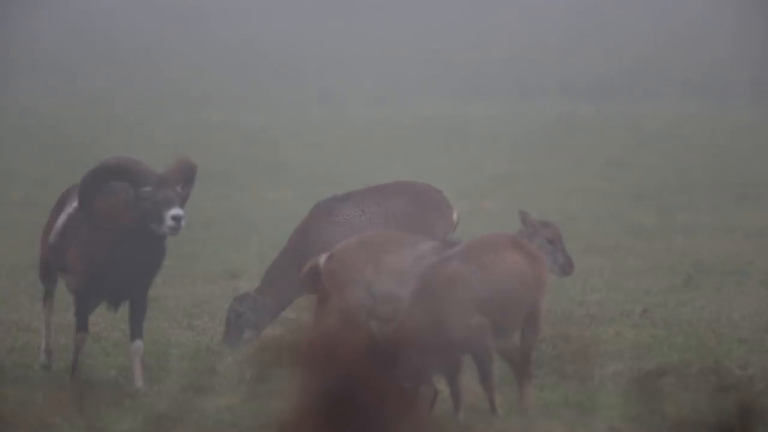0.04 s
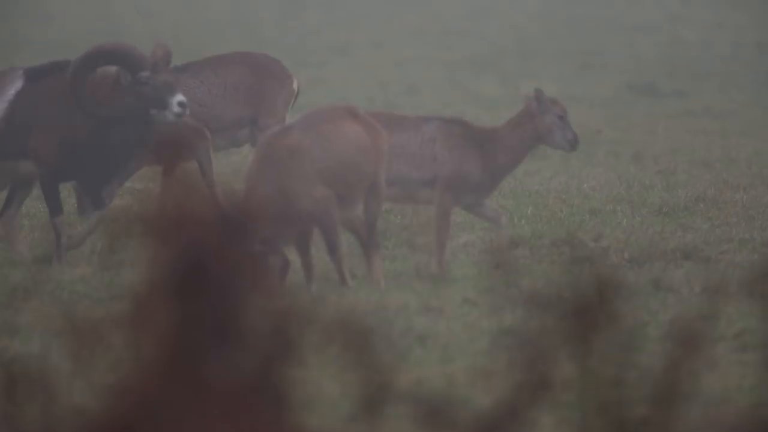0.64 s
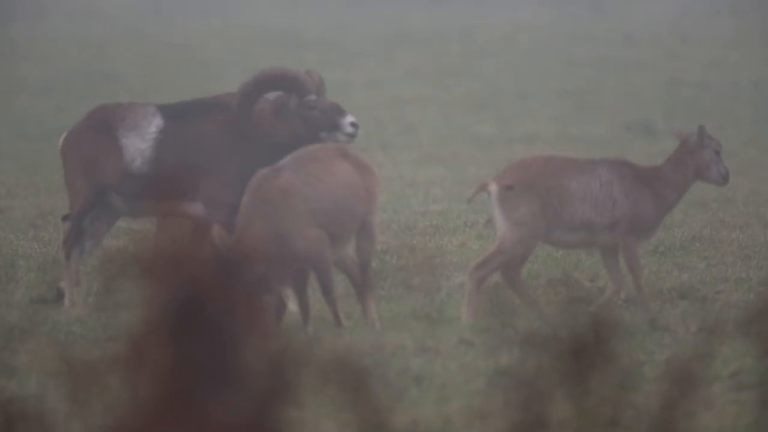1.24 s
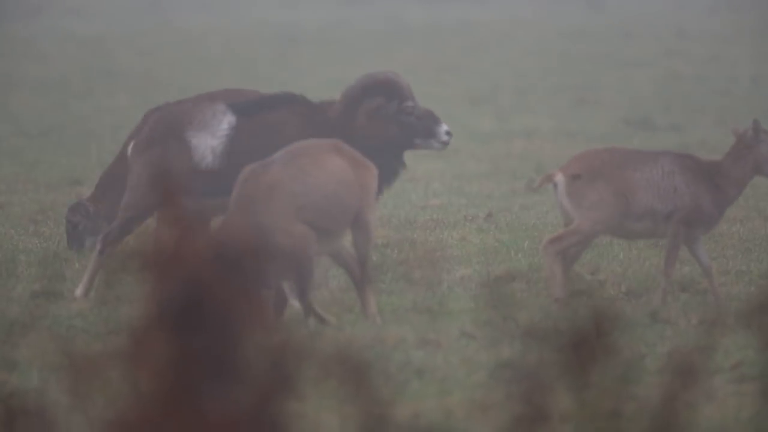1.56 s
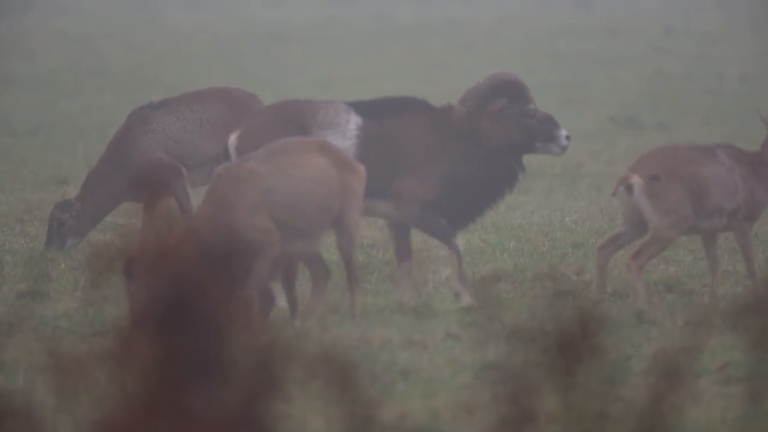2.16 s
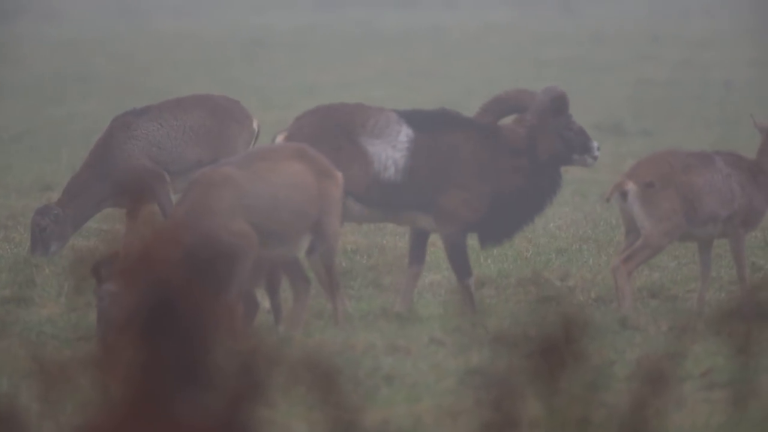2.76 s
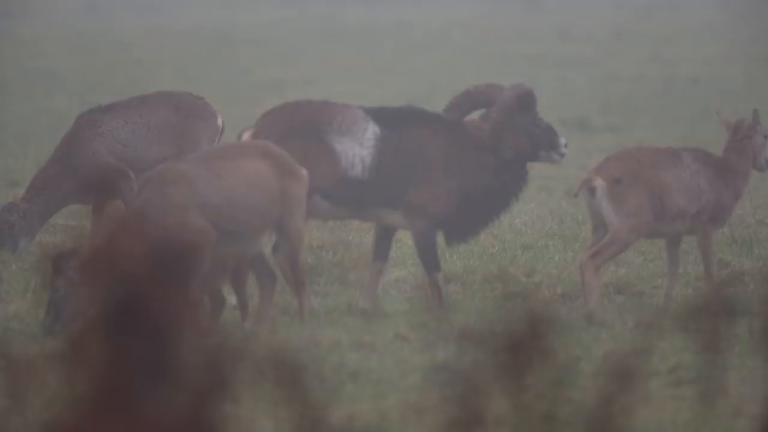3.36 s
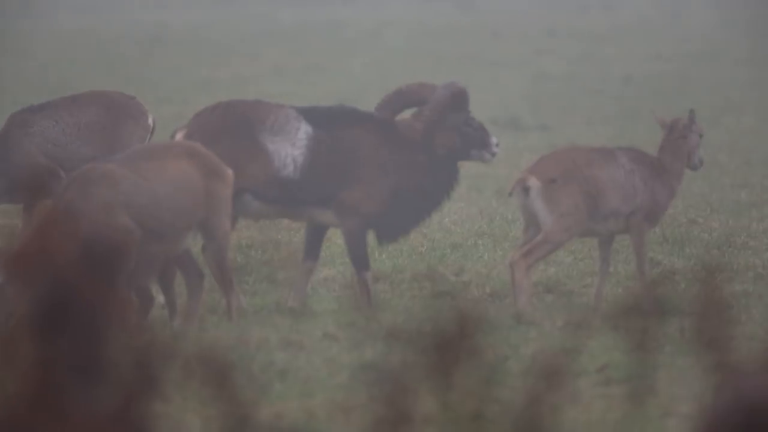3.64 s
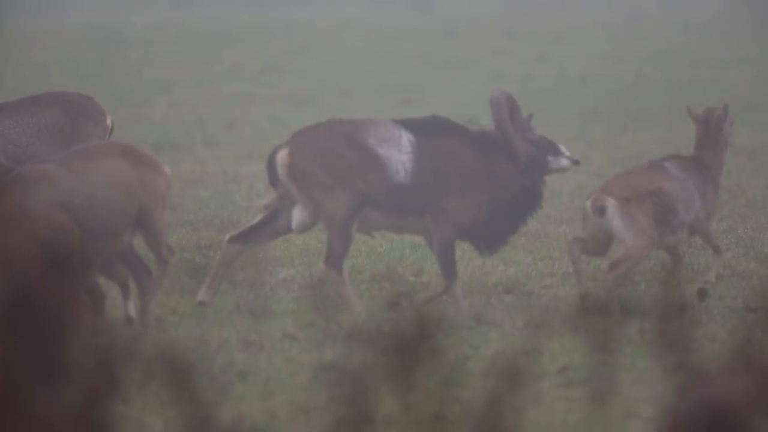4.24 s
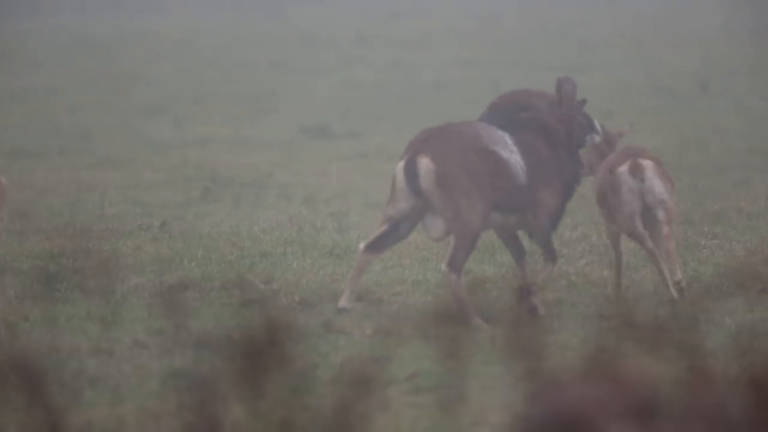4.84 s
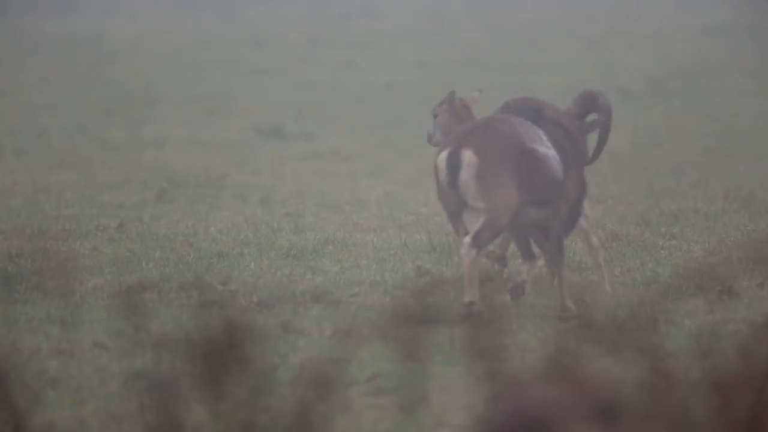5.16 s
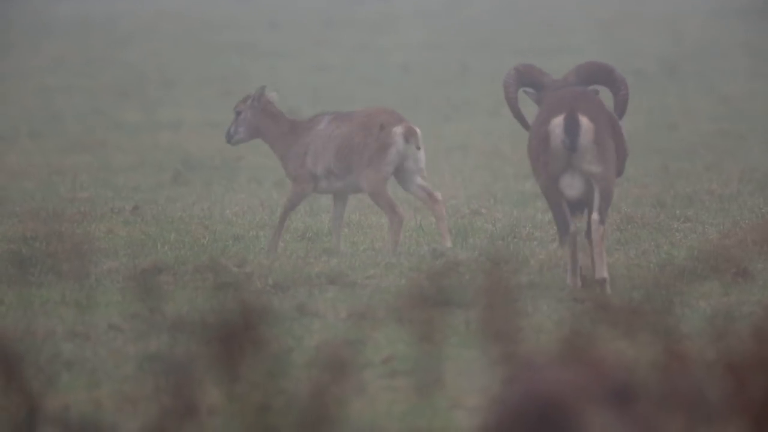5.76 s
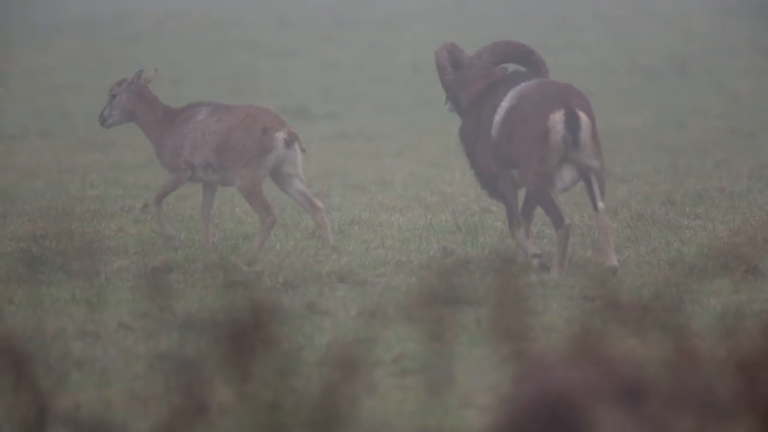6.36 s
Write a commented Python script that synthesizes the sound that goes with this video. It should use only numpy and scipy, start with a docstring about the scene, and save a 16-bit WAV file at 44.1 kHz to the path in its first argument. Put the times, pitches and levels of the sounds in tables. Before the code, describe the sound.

A soft, steady hiss of drizzle on an open meadow runs through the whole six and a half seconds, with a faint, fine patter on the grass. From about 0.3 seconds, nearer drops tick lightly and irregularly on leaves and stalks, clearest around 1.1 to 1.7, 3.4 and 4.8 seconds. A very faint, distant low rumble swells and fades around 1 second. At about 5.6 seconds, rain jacket fabric brushes right by the microphone with a short, hollow scuff and a dry snap. A second, longer and brighter swish follows from 5.9 to 6.1 seconds, ending in a cluster of sharp fold cracks, the loudest moment. The cloth bumps softly against the microphone at about 5.9 and 6.3 seconds. A faint rustle with one small click closes the scene near 6.5 seconds, over the continuing drizzle.

```python
"""Drizzle hisses over a foggy meadow, countless small impacts merging into noise. From the start,
nearer drops tick on leaves and stalks, exciting damped resonances; a far rumble swells near 1 s.
From about 5.6 s the cloth of a rain jacket brushes twice right by the microphone: friction gives
a hollow scuff, then a brighter swish. Folds snap and hum, the cloth bumps softly against the
microphone, and a faint rustle ends the scene."""
import sys
import numpy as np
from scipy import signal
from scipy.fft import rfft, irfft
from scipy.io import wavfile

SR = 44100
rng = np.random.default_rng(int(sys.argv[2]) if len(sys.argv) > 2 else 0)


def log_audio(samples):
    """Write samples as a 16-bit WAV file to the path given in sys.argv[1]."""
    # one column per channel
    frames = np.atleast_2d(samples).T
    # limit to full scale, then quantise
    limited = np.clip(frames, -1, 1)
    pcm = np.round(limited * 32767).astype(np.int16)
    wavfile.write(sys.argv[1], SR, pcm)


N = 286209


def from_db(db):
    """Amplitude ratio of a level: a factor of ten for every 20 dB."""
    return 10 ** (np.asarray(db) / 20)


def rms_one(x):
    """Normalisation to unit mean power."""
    return x / np.sqrt(np.mean(x ** 2) + 1e-20)


def drift(rate):
    """Low-passed noise: a smooth fluctuation of unit RMS, about `rate` turns a second."""
    step = 40   # audio samples per control point
    pole = np.exp(-2 * np.pi * step * rate / SR)
    noise = rng.standard_normal(N // step + 2002)
    slow = signal.lfilter([1], [1, -2 * pole, pole * pole], noise)[2000:]   # steady state only
    return np.interp(np.arange(N) / step, np.arange(len(slow)), rms_one(slow))


def coloured(x, spectrum):
    """Spectral shaping to unit power, falling a further 12 dB per octave below the first row."""
    hz, db = np.transpose(spectrum)
    bins = np.maximum(np.arange(N // 2 + 1) * SR / N, 1)
    roll_off = np.minimum(bins / hz[0], 1) ** 2
    gain = from_db(np.interp(np.log(bins), np.log(hz), db))
    return rms_one(irfft(rfft(x) * roll_off * gain, N))


def resonate(x, hz, width_hz):
    """A second-order resonator with unit gain at its centre frequency."""
    b, a = signal.iirpeak(min(hz, .4 * SR), hz / min(width_hz, .3 * SR), fs=SR)
    return signal.lfilter(b, a, x + 1e-18)


def resonate_twice(x, hz, width_hz):
    """Two equal resonators in cascade: a narrower band with steeper skirts."""
    return resonate(resonate(x, hz, width_hz), hz, width_hz)


def grains(per_s, spread_db):
    """Shot noise: independent impulses of random size and sign."""
    sizes = from_db(spread_db * np.minimum(rng.exponential(1, N), 4))
    signs = rng.choice([-1, 1], N)
    return sizes * signs * (rng.random(N) < per_s / SR)


def tick(hz, q, size=4096):
    """Impulse response of a light, well damped surface: a cycle or two of unit peak."""
    ring = resonate_twice(signal.unit_impulse(size), hz, hz / q)
    return ring / np.abs(ring).max()


def add(out, s, sound):
    """Superposition: a sound joins the mix at time s."""
    at = int(np.clip(round(s * SR), 0, N - 1))
    out[at:at + len(sound)] += sound[:N - at]


def ticks(rows, q):
    """Superposed impulse responses, one for each row of t/s, peak level/dB, f/Hz."""
    out = np.zeros(N)
    for s, peak_db, hz in rows:
        add(out, s, from_db(peak_db) * tick(hz, q))
    return out


def drizzle(hiss_db=-41.0, waver_db=0.53, patter_db=-53, drops_per_s=260, spread_db=3.0):
    """Incoherent summation: far droplets merge into hiss; nearer ones patter faintly on the grass."""
    # Spectrum of the hiss: f/Hz, relative spectral level/dB
    hiss_spectrum = [(25, -27), (50, -13), (100, -7.5), (180, -2.5), (300, -0.5), (600, 0.5), (1200, -2),
                     (2400, -5), (3600, -6), (5500, -9.5), (8000, -14), (11500, -17), (15000, -22.5)]
    hiss = from_db(hiss_db + waver_db * drift(3.4)) * coloured(rng.standard_normal(N), hiss_spectrum)
    pitches_hz = np.geomspace(1700, 5600, num=8)
    per_pitch = drops_per_s / len(pitches_hz)
    patter = sum(resonate_twice(grains(per_pitch, spread_db), hz, hz / 2) for hz in pitches_hz)
    return hiss + from_db(patter_db) * rms_one(patter)


def rumble(hz=250, width_hz=220, rest_db=-62.5, swell_db=-54, swell_at_s=0.99, swell_half_s=0.44):
    """Attenuation with distance: only the low end of a far noise carries through the fog, swelling once."""
    swell = np.exp(-((np.arange(N) / SR - swell_at_s) / swell_half_s) ** 2)
    amplitude = from_db(rest_db) + from_db(swell_db) * swell
    return amplitude * rms_one(resonate_twice(rng.standard_normal(N), hz, width_hz))


def drips(leaf_db=-0.5, leaf_q=1.6, stalk_hz=1820, stalk_q=1.6,
          spatter_db=-15.0, scatter_db=-37.0, scatter_s=0.021, size=4096):
    """Impact excitation: a drop flicks a leaf, may knock its stalk, and spatters into the undergrowth."""
    # Nearest drops: t/s, level/dB, leaf f/Hz, spatter decay/s, relative amplitude of the stalk's knock
    drops = [(0.3426, -24, 4200, 0.014, 0), (0.7963, -22, 4200, 0.013, .4), (1.0461, -24, 7400, .003, 0),
             (1.1166, -28, 5900, .003, 0), (1.1472, -14.5, 3480, 0.0023, 0.44),
             (1.3591, -18.5, 5560, 0.0024, 0), (1.676, -29, 2400, .003, 0),
             (1.7315, -19.5, 4330, .0036, 0.16), (1.7866, -29, 1900, .005, 0),
             (2.389, -25.5, 4500, 0.0093, 0), (2.6494, -25.5, 3100, 0.02, 0), (2.95, -26, 2400, .003, 0),
             (3.36, -18.5, 4120, .005, .4), (3.4323, -24, 5800, .005, .5), (3.531, -21.5, 4900, .003, 0),
             (3.706, -24, 4570, .004, 0), (4.2852, -26.5, 5800, .006, 0), (4.713, -24, 4100, .007, .3),
             (4.7694, -19.5, 4500, 0.0036, 0), (5.7177, -22.5, 2500, .008, 0.1)]
    out, t = np.zeros(N), np.arange(size) / SR
    for s, level_db, hz, decay_s, knock in drops:
        flick = from_db(leaf_db) * tick(hz, leaf_q) + knock * tick(stalk_hz, stalk_q)
        noise = rng.standard_normal(size)
        spray = rms_one(resonate(resonate(noise, hz, hz * 0.57), hz, hz * 1.9))
        spatter = from_db(spatter_db) * np.exp(-t / decay_s)
        scatter = from_db(scatter_db) * np.exp(-t / scatter_s)   # tail scattered by the undergrowth
        add(out, s, from_db(level_db) * (flick + spray * (spatter + scatter)))
    return out


def stroke(s, attack_s, release_s, roundness=1.6):
    """Sliding speed of one stroke, peaking at 1; roundness 1 gives a cusp, 2 a Gaussian bell."""
    t = np.arange(N) / SR - s
    from_peak = np.abs(t / np.where(t < 0, attack_s, release_s))
    return np.exp(-np.minimum(from_peak ** roundness, 20))


def cloth(rub_trim_db=-0.5, slips_per_s=14000, spread_db=3.5, judder_db=2.33,
          hollow_hz=256, hollow_width_hz=160, hollow_stretch=1.08):
    """Stick-slip friction: threads slip in a dense, juddering crackle while the air beneath resonates."""
    # Strokes of cloth: fastest at t/s, attack/s, release/s, rub level/dB, sheen level/dB, hum level/dB
    strokes = [(5.647, 0.044, 0.035, -28, -32.5, -30.5), (5.954, 0.026, 0.032, -24.5, -31.5, -33.5),
               (6.04, 0.097, 0.068, -31, -31.5, -47), (6.16, 0.018, 0.044, -41.5, -45, -52),
               (6.35, 0.018, 0.021, -40.5, -47, -57), (6.46, 0.1, .1, -40.5, -44, -60)]
    # Spectrum of the dull rub: f/Hz, relative spectral level/dB
    rub_spectrum = [(90, -22), (170, -9), (280, -3.5), (500, 0.5), (900, -1.5), (1800, -0.5), (3000, -4),
                    (4800, -4.5), (6500, -7), (10000, -33)]
    # Spectrum of the bright sheen: f/Hz, relative spectral level/dB
    sheen_spectrum = [(3500, -8), (5000, -6), (6500, 0.5), (9000, -4), (12500, -7), (15800, -12)]
    rub = sheen = hollow = 0
    for s, attack_s, release_s, rub_db, sheen_db, hum_db in strokes:
        speed = stroke(s, attack_s, release_s)
        longer_swell = stroke(s, attack_s * hollow_stretch, release_s * hollow_stretch)
        rub = np.hypot(rub, from_db(rub_db) * speed)   # overlapping strokes add in power
        sheen = np.hypot(sheen, from_db(sheen_db) * speed)
        hollow = np.hypot(hollow, from_db(hum_db) * longer_swell)
    dull = rub * from_db(rub_trim_db) * coloured(grains(slips_per_s, spread_db), rub_spectrum)
    bright = sheen * coloured(grains(slips_per_s, spread_db), sheen_spectrum)
    hum = hollow * rms_one(resonate_twice(rng.standard_normal(N), hollow_hz, hollow_width_hz))
    judder = from_db(judder_db * drift(160))
    return (dull + bright) * judder + hum


def snaps():
    """Snap-through buckling: stiff folds flip over with a dry crack."""
    # Snapping folds: t/s, peak level/dB, f/Hz
    folds = [(5.644, -8.5, 4800), (6.0514, -15, 7000), (6.0633, -10, 8500), (6.0643, -9, 5000),
             (6.081, -14, 8000), (6.087, -1, 8300), (6.4536, -17, 8000)]
    return ticks(folds, q=0.74)


def catches(size=8192):
    """Resonance driven by friction: the cloth catches and briefly sets a slack or taut fold humming."""
    # Humming folds: centre t/s, Gaussian half length/s, f/Hz, nominal bandwidth/Hz, level/dB
    folds = [(5.675, 0.01, 3000, 700, -30.5), (5.678, 0.017, 255, 100, -34.5), (5.956, .014, 63, 54, -41),
             (5.975, 0.0094, 800, 480, -29), (6.006, 0.014, 322, 160, -34.5), (6.02, 0.025, 145, 60, -39.5)]
    out, t = np.zeros(N), (np.arange(size) - size // 2) / SR
    for s, half_s, hz, width_hz, level_db in folds:
        swell = np.exp(-(t / half_s) ** 2 / 2) * signal.windows.tukey(size)
        hum = swell * resonate_twice(rng.standard_normal(size), hz, width_hz * 1.7)
        swell_rms = np.sqrt(np.mean(swell ** 2))   # refers the level to the crest of the swell
        add(out, s + t[0], from_db(level_db) * rms_one(hum) * swell_rms)
    return out


def bumps():
    """Heavily damped impact: cloth meets the microphone with a dead thud."""
    # Soft contacts: t/s, peak level/dB, f/Hz
    contacts = [(5.908, -26.5, 140), (6.2825, -27, 600)]
    return ticks(contacts, q=0.7)


def scene():
    """Linear superposition at one microphone, which feeds both channels."""
    pressure = drizzle() + rumble() + drips() + cloth() + snaps() + catches() + bumps()
    return np.tile(pressure, (2, 1))


def record(dry):
    """Band limiting: a steep low-pass filter removes the highest treble."""
    cutoff_hz = 15900
    low_pass = signal.firwin(401, cutoff_hz, fs=SR, window="blackman")
    return signal.fftconvolve(dry, low_pass[None], "same", axes=1)


dry = scene()
out = record(dry)
log_audio(out)
```